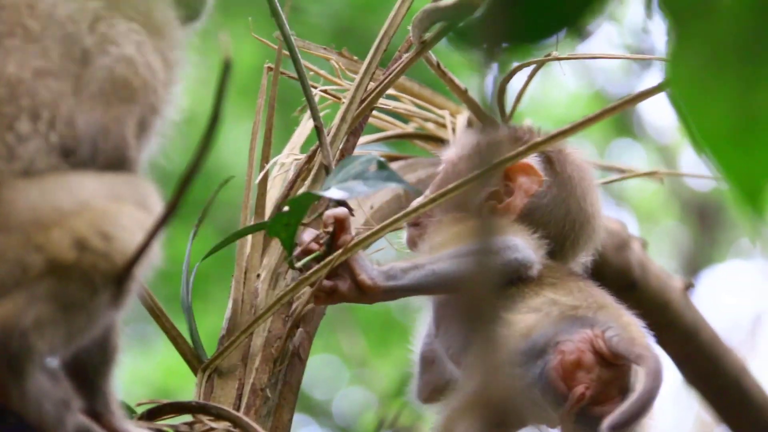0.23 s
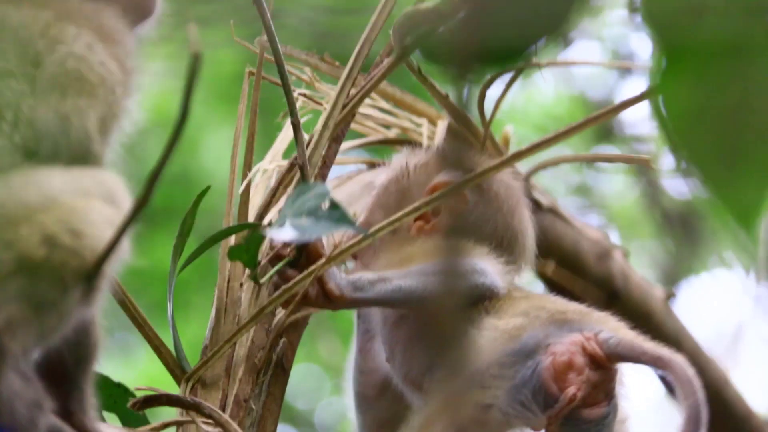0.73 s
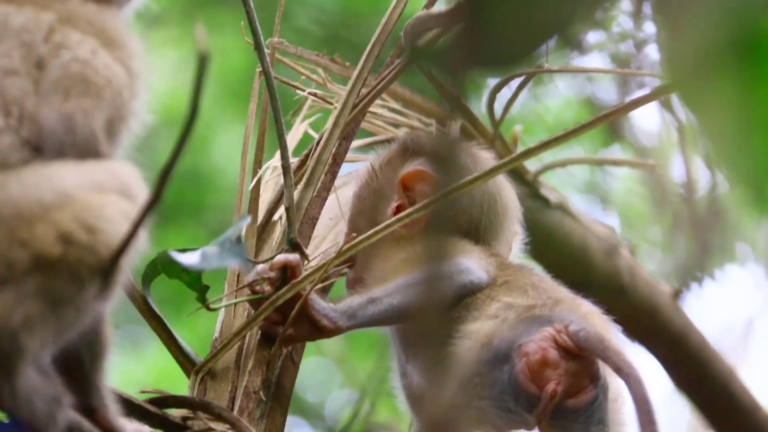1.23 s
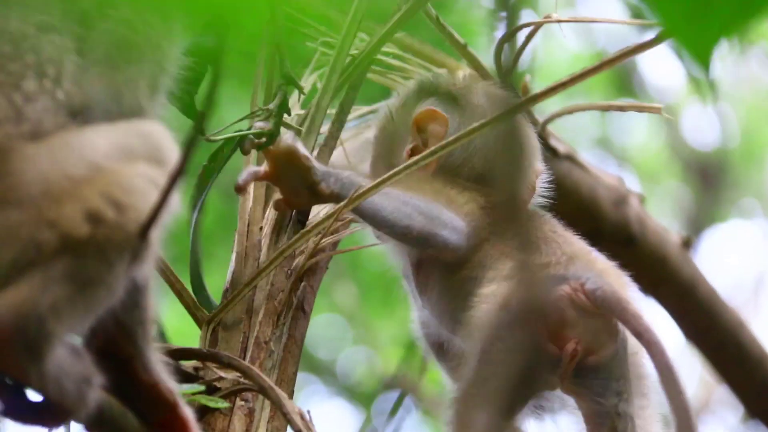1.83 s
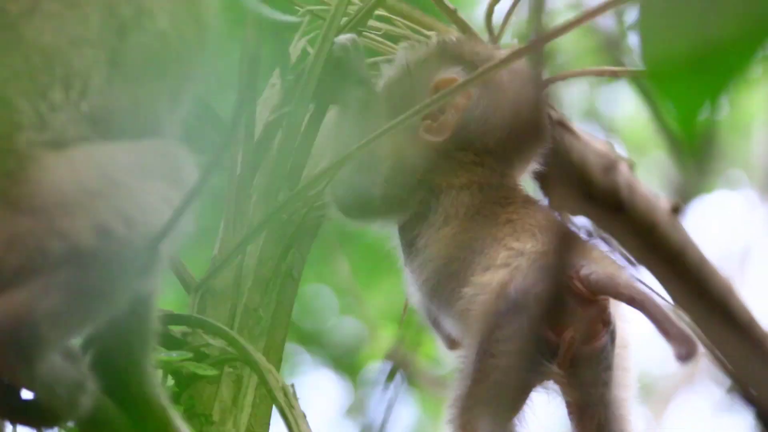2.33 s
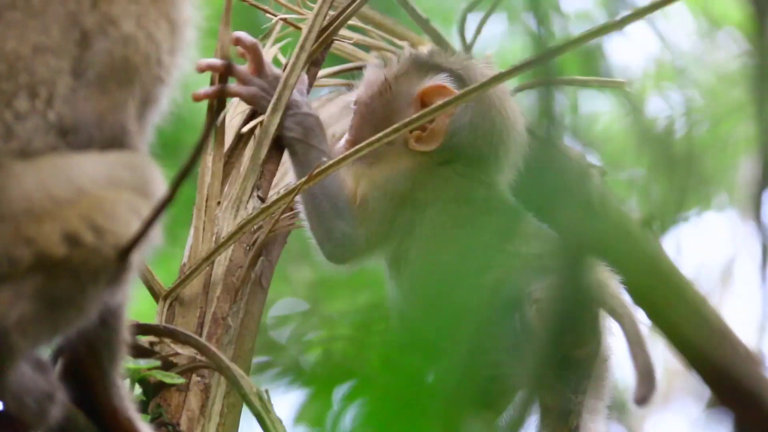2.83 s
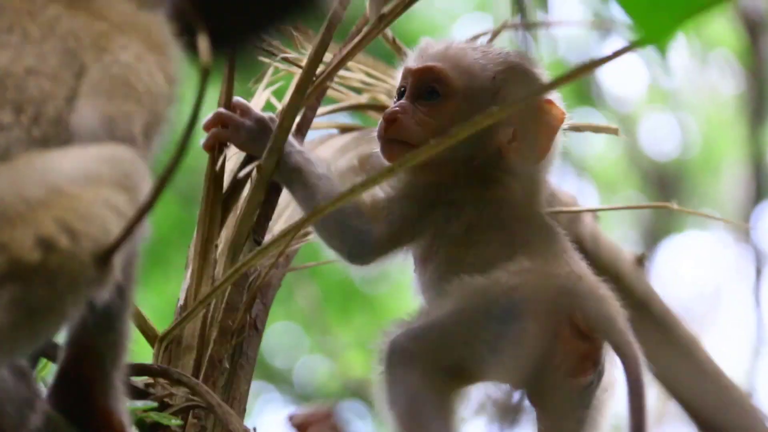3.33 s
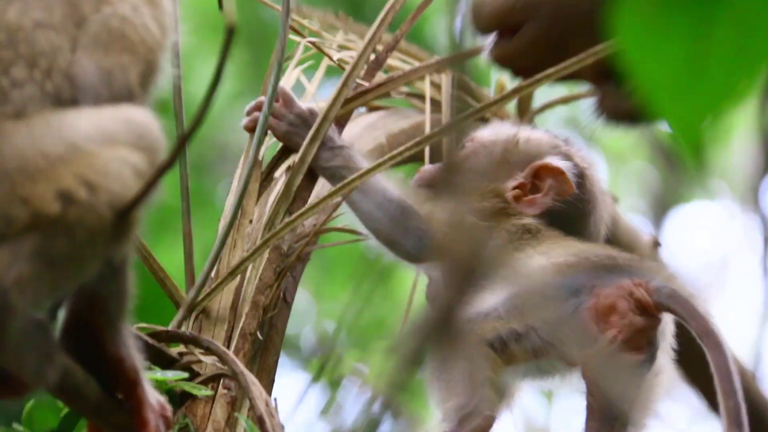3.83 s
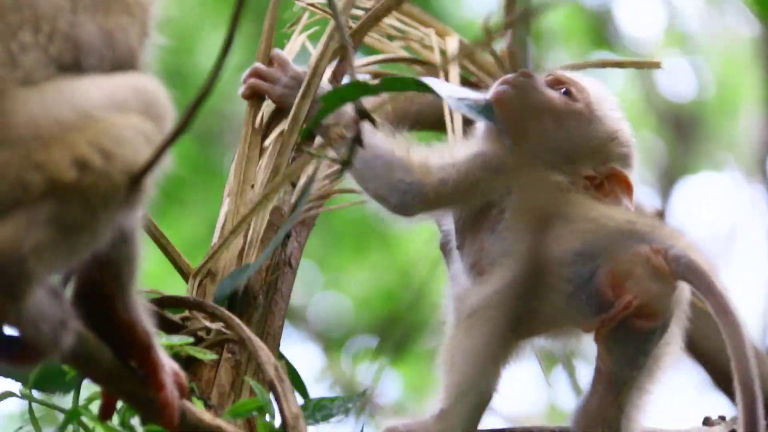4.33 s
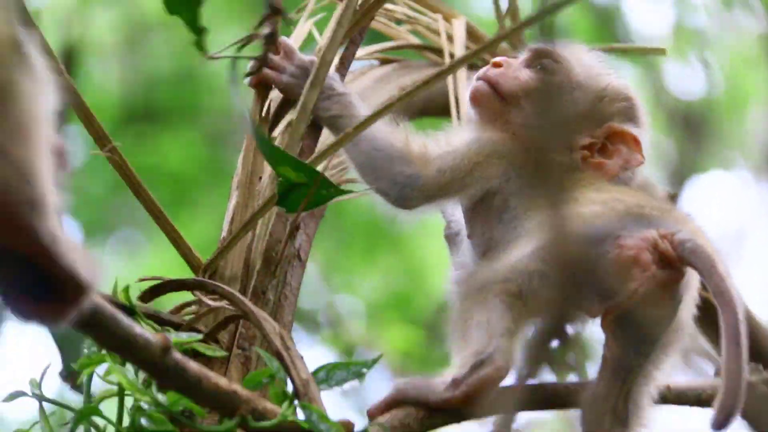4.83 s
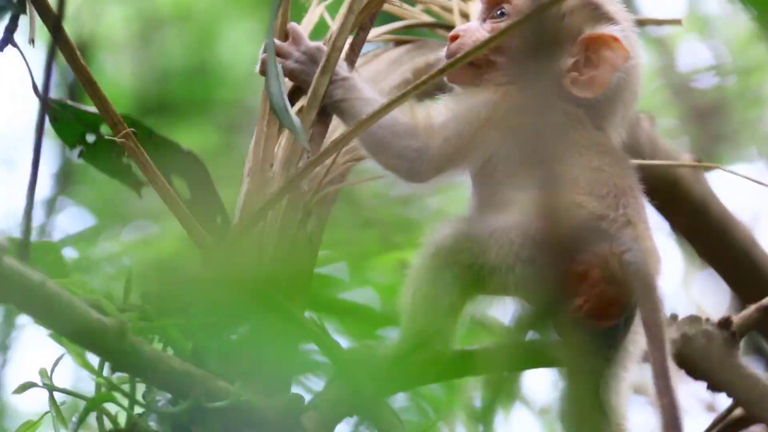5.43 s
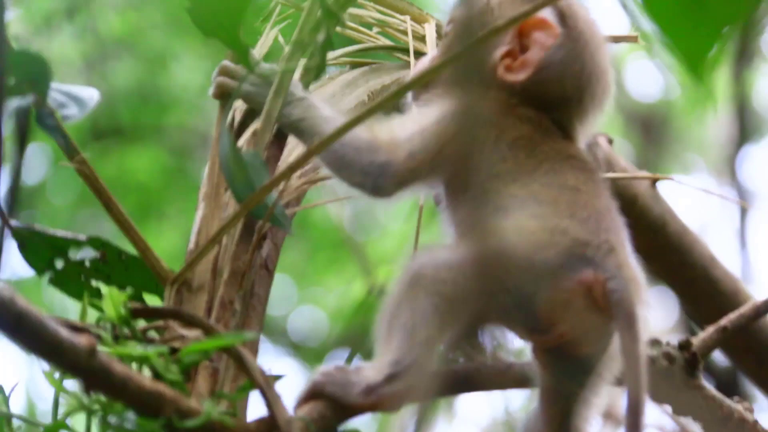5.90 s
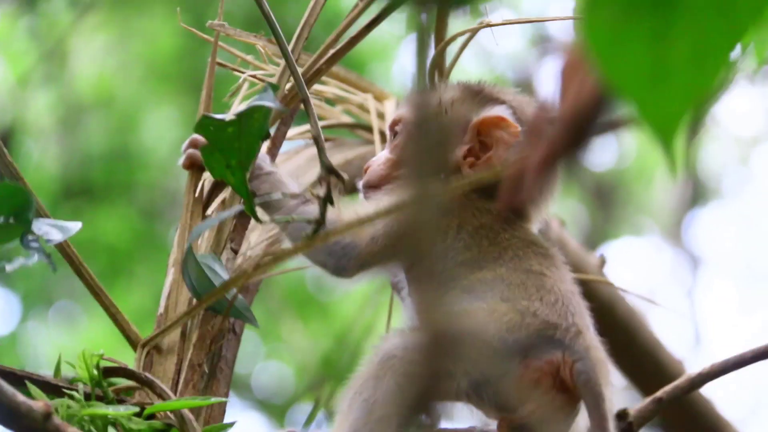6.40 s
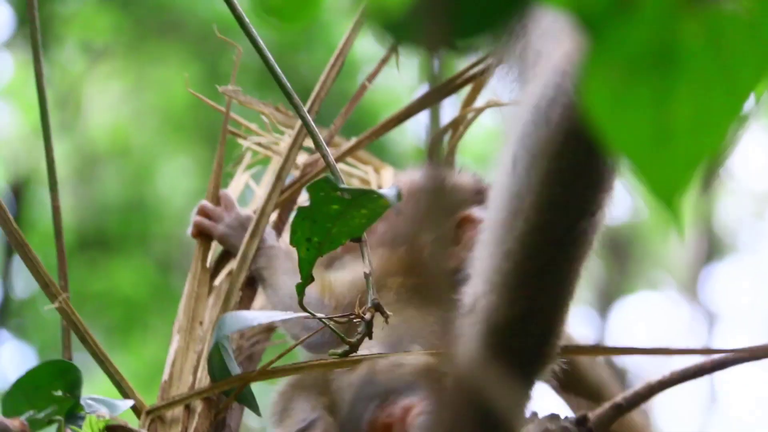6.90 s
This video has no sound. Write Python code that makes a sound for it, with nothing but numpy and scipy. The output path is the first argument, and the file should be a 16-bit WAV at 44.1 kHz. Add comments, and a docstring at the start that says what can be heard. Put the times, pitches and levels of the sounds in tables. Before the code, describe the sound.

A young monkey calls three times in quick succession, with loud falling whistles that echo through the trees, the middle one shorter, lower and wavering. Before and after, distant birds give thin chips and slurred notes, with two hoarse calls and short nasal trills early on. A soft forest hush lies underneath and rises with each coo, along with a faint insect and tiny buzzes from a focusing motor at the microphone.

```python
"""A young macaque gives three loud whistled coos that slide down and ring on among the trees.
Further off, small birds whistle, chip, rasp and trill over a faint insect and a low forest hush.
A camera's lens motor buzzes faintly. The recorder's noise suppressor opens in steps for each coo,
so the hush swells with it."""
import sys
import numpy as np
from scipy import signal
from scipy.fft import rfft, irfft, next_fast_len
from scipy.io import wavfile
from scipy.ndimage import uniform_filter1d, minimum_filter1d, map_coordinates

SR = 44100
rng = np.random.default_rng(int(sys.argv[2]) if len(sys.argv) > 2 else 0)


def output_pcm(signal):
    """Save a mono or channel-first signal as 16-bit PCM at the path in sys.argv[1].

    Samples are clipped to [-1, 1] before scaling.
    """
    pcm = np.clip(np.atleast_2d(signal).T, -1, 1) * 32767
    wavfile.write(sys.argv[1], SR, np.round(pcm).astype(np.int16))


N = 315711

# Forest hush and microphone hiss. Each row: frequency in Hz, relative density in dB.
HUSH_SPECTRUM = [(25, -22.5), (45, -6), (65, -4), (120, -2.5), (170, -7), (450, -7), (1000, -9),
                 (1600, -12.3), (3200, -17), (3900, -20), (4600, -26.5), (5100, -28.5), (7500, -31),
                 (15000, -32.5)]
# Far drone. Each row: centre in Hz, width in Hz, level in dB.
DRONE_BANDS = [(56, 7.3, -74.5), (68.7, 5.4, -72.5), (103, 8, -71)]
# Each row: time in seconds, drone gain in dB.
DRONE_GAIN = [(0, -1.5), (1.6, 2), (4, 1), (5.1, 4.5), (5.8, 1), (7.16, 0)]
# Insect bouts. Each row: middle in seconds, length in seconds.
BOUTS = [(0, 0.31), (0.908, .5), (2.55, 1.2), (6.147, 0.44), (7.15, 0.46)]
# Forest ring. Each row: frequency in Hz, T60 in seconds.
FOREST_T60 = [(500, 0.29), (1700, 1.16), (3000, 1.39), (4500, 1.3), (6500, 0.71), (12000, 0.38)]
# Thin whistles. Each row: start and length in seconds, start and end pitch in Hz, level in dB.
HIGH_WHISTLES = [(2.386, 0.38, 6740, 5640, -74), (4.045, 0.3, 7350, 5950, -75)]
# Single slurs. Each row: start and length in seconds, start and end pitch in Hz, level in dB.
SLURRED_NOTES = [(0.01, 0.061, 1900, 1534, -61.5), (0.714, 0.09, 3220, 3010, -56.5),
                 (0.866, 0.12, 2540, 2350, -60), (1.168, 0.11, 1914, 1620, -59),
                 (3.017, 0.086, 2316, 2382, -51), (6.236, 0.32, 1059, 1109, -67),
                 (6.632, 0.022, 6410, 6250, -65), (6.649, 0.029, 6400, 3050, -66),
                 (7.097, 0.034, 6860, 4700, -67)]
# Main lens moves. Each row: start in seconds, length in seconds, level in dB.
FOCUS_MOVES = [(0.19, 0.1, -62), (1.045, 0.035, -58), (1.29, 0.044, -57), (4.725, 0.066, -52),
               (5.195, 0.024, -54), (5.84, 0.14, -54.5), (6.17, 0.045, -59), (6.375, 0.051, -56.5),
               (6.6, 0.039, -57.5), (6.785, 0.048, -60.5)]
# Bird chips. Each entry: start in seconds.
CHIP_STARTS_S = [0.372, 0.657, 0.985, 1.238, 1.755, 2.045, 2.928, 3.208, 4.31, 4.567, 4.957, 5.243, 5.553,
                 6.168, 6.465]
# Burry calls. Each row: start in seconds, first note's delay in seconds, pitch in Hz, level in dB.
BURRS = [(1.356, 0.061, 2323, -51), (2.138, .024, 2270, -50.5)]
# Flick opening a burry call. Each row: multiple of the pitch, gain in dB.
FLICK_TIMBRE = [(1, 0.5), (1.4, -11)]
# Trills. Each row: start in seconds, note count, first pitch in Hz, first level in dB.
TRILL_RUNS = [(1.752, 4, 912, -58), (2.595, 6, 906, -58.5)]
# Nasal trill note. Each row: harmonic number, gain in dB.
TRILL_TIMBRE = [(2, -1.5), (3, -9.5), (4, 1.5), (5, -13)]
# Mouth response to a coo's octave. Each row: frequency in Hz, gain in dB.
MOUTH_RESPONSE = [(3300, -4), (3850, 7), (4200, -13.5), (5500, -19), (6100, -11.5), (6600, -5),
                  (6850, -13.5)]
# High coos. Each row: start in seconds, length in seconds, held level in dB.
HIGH_COO_CALLS = [(2.833, 0.497, -44), (4.479, 0.5, -41.5)]
# Their slide: drop, plateau, second fall. Each row: fraction of the call, pitch in Hz.
HIGH_COO_PITCH = [(0, 4610), (.075, 3624), (.12, 3453), (.25, 3235), (.56, 2960), (.77, 2510), (.89, 2214),
                  (1, 2078)]
# Wavering effort of the low coo. Each row: time in seconds, level in dB.
LOW_COO_EFFORT = [(3.612, -53.5), (3.65, -42.5), (3.69, -49.5), (3.704, -32), (3.77, -49.5), (3.783, -36),
                  (3.911, -45.5), (3.944, -42.5), (4.0, -58)]
# Suppressor's detector weighting. Each row: frequency in Hz, gain in dB.
DETECTOR_WEIGHT = [(1700, -0.5), (2800, 0.5)]
# Suppressor steps. Each row: threshold in dB, added gain in dB.
SUPPRESSOR_STEPS = [(-48.5, 3.5), (-44, 5.5), (-39.5, 5.5)]


def amp(db):
    """Decibels to gain."""
    return 10 ** (np.asarray(db) / 20)


def unit_rms(x):
    """Scale to rms 1."""
    return x / np.sqrt(np.mean(x ** 2) + 1e-20)


def along(points, hz):
    """Interpolate (Hz, value) points on a log axis."""
    knots_hz, values = np.transpose(points)
    return np.interp(np.log(hz + 1), np.log(knots_hz + 1), values)


def wobble(rate_hz):
    """Smooth random curve through rate_hz knots a second."""
    knots = rng.standard_normal(int(N * rate_hz / SR) + 4)
    return map_coordinates(knots, [np.arange(N) * rate_hz / SR])


def filtered(x, response):
    """Apply a gain given as a function of Hz."""
    size = next_fast_len(N + SR // 2)
    return irfft(rfft(x, size) * response(np.fft.rfftfreq(size, 1 / SR)), size)[:N]


def add(track, start_s, sound):
    """Mix a sound into the track."""
    part = track[max(round(start_s * SR), 0):][:len(sound)]
    part += sound[:len(part)]


def glide(length_s, start_hz, end_hz, rough=0, partials=((1, 0),)):
    """Soft-edged sliding note; rough is its fractional pitch flutter."""
    n = max(int(length_s * SR), 16)
    flutter = map_coordinates(rng.standard_normal(256), [np.arange(n) * 450 / SR], mode="wrap")
    pitch_hz = np.geomspace(start_hz, end_hz, n) * (1 + rough * flutter)
    phase = 2 * np.pi * np.cumsum(pitch_hz) / SR
    return signal.windows.tukey(n, .5) * sum(amp(db) * np.sin(k * phase) for k, db in partials)


def among_trees(x, near_db, far_db, near_t60_s):
    """Direct sound, quick scatter off close trunks and leaves, and the forest's long ring."""
    hz, frame_s, spectra = signal.stft(rng.standard_normal(3 * SR // 2), SR, nperseg=256)
    decay = amp(-60 * frame_s / along(FOREST_T60, hz)[:, None])
    far = signal.istft(spectra * decay, SR, nperseg=256)[1]
    t = np.arange(len(far)) / SR
    far *= 1 - np.exp(-t / .038)
    trunks = rng.standard_normal(len(t)) ** 3  # cubed: single echoes stand out
    near = trunks * amp(-60 * t / near_t60_s) * (1 - np.exp(-t / .0028))
    echoes = amp(near_db) * near / np.linalg.norm(near) + amp(far_db) * far / np.linalg.norm(far)
    return x + signal.fftconvolve(x, echoes)[:N]


def hush(air_db=-58.5):
    """Near-steady air and hiss over a wavering far drone."""
    air = unit_rms(filtered(rng.standard_normal(N), lambda hz: amp(along(HUSH_SPECTRUM, hz))))
    drone = np.zeros(N)
    for centre_hz, width_hz, db in DRONE_BANDS:
        band = filtered(rng.standard_normal(N), lambda hz: 1 / (1 + (2 * (hz - centre_hz) / width_hz) ** 2))
        drone += amp(db) * unit_rms(band)
    drone_gain_db = np.interp(np.arange(N) / SR, *np.transpose(DRONE_GAIN))
    return air * amp(air_db + .2 * wobble(2.5)) + drone * amp(drone_gain_db)


def insect(centre_hz=4460, width_hz=110, level_db=-78):
    """Narrow buzz, throbbing unevenly; each bout swells and fades."""
    t = np.arange(N) / SR
    buzz = filtered(rng.standard_normal(N), lambda hz: np.exp(-((hz - centre_hz) / width_hz) ** 2))
    bouts = sum(np.exp(-(2 * (t - middle_s) / length_s) ** 2) for middle_s, length_s in BOUTS)
    return unit_rms(buzz) * bouts * amp(level_db + 2.5 * wobble(32))


def whistling_birds(rise_start_s=.23, rise_period_s=.066, rise_db=-59.5):
    """Canopy whistles: three rising notes, thin sinking tones and single slurs."""
    song = np.zeros(N)
    for k in range(3):
        rise = glide(.054, start_hz=2330, end_hz=2750, rough=.034)
        add(song, rise_start_s + k * rise_period_s, amp(rise_db) * rise)
    for notes, rough in (HIGH_WHISTLES, .003), (SLURRED_NOTES, .022):
        for start_s, length_s, start_hz, end_hz, db in notes:
            add(song, start_s, amp(db) * glide(length_s, start_hz, end_hz, rough))
    return among_trees(song, near_db=-7, far_db=-6, near_t60_s=.3)


def lens_motor(slot_s=.53, nudge_s=.05, nudge_db=-65):
    """Short low focusing buzzes, plus one faint nudge at a random moment in each slot."""
    buzz = np.zeros(N)
    nudges = [(start_s, nudge_s, nudge_db) for start_s in slot_s * (np.arange(12) + rng.random(12))]
    for start_s, length_s, db in list(FOCUS_MOVES) + nudges:
        move = glide(length_s, start_hz=218.8, end_hz=213.6, partials=((1, 0), (2, -9)))
        add(buzz, start_s, amp(db) * move)
    return buzz


def chipping_bird(level_db=-69):
    """Very fast sweeps that swell as they fall, blurred by leaves."""
    song = np.zeros(N)
    for start_s in CHIP_STARTS_S:
        sweep = glide(.02, start_hz=7800, end_hz=3800, rough=.035)
        add(song, start_s, amp(level_db + np.linspace(-4, 2, len(sweep))) * sweep)
    return among_trees(song, near_db=3, far_db=-2, near_t60_s=.09)


def burry_bird(flick_gain_db=-4.5, period_s=.05, loss_db=2):
    """Rough upward flick, then three hoarse notes, each weaker than the last."""
    song = np.zeros(N)
    for start_s, delay_s, hz, db in BURRS:
        flick = glide(.036, start_hz=2400, end_hz=3473, rough=.07, partials=FLICK_TIMBRE)
        add(song, start_s, amp(db + flick_gain_db) * flick)
        for k in range(3):
            note = glide(.035, hz, hz, rough=.042)
            add(song, start_s + delay_s + k * period_s, amp(db - k * loss_db) * note)
    return among_trees(song, near_db=-1, far_db=-6, near_t60_s=.47)


def trilling_bird(period_s=.0736, sag_hz=5, swell_db=.33):
    """Even runs of falling nasal notes, each lower and louder than the last."""
    song = np.zeros(N)
    for start_s, count, first_hz, db in TRILL_RUNS:
        for k in range(count):
            hz = first_hz - k * sag_hz
            note = glide(.034, hz * 1.03, hz * .97, rough=.022, partials=TRILL_TIMBRE)
            add(song, start_s + k * period_s, amp(db + k * swell_db) * note)
    return among_trees(song, near_db=-2, far_db=-5.5, near_t60_s=.32)


def coo(pitch_hz, level_db, octave_db, jitter, fade_s=.006):
    """Unsteady, nearly pure throat whistle; mouth resonances lift its weak octave."""
    n = len(pitch_hz)
    pitch_hz = pitch_hz * (1 + jitter * wobble(70.1) + .0024 * wobble(500))[:n]
    phase = 2 * np.pi * np.cumsum(pitch_hz) / SR
    fades = signal.windows.tukey(n, 2 * fade_s * SR / n)
    effort = fades * amp(level_db + 1.8 * wobble(80)[:n])
    octave_gain = amp(octave_db + along(MOUTH_RESPONSE, 2 * pitch_hz))
    return np.sqrt(2) * effort * (np.sin(phase) + octave_gain * np.sin(2 * phase))


def high_coo(length_s, held_db, onset_s=.02, swell_s=.092, release_s=.14):
    """Long slide that starts softly and rings out as it passes a throat resonance."""
    throat_hz, throat_width_hz = 3244, 49
    t = np.arange(int(length_s * SR)) / SR
    pitch_hz = np.interp(t / length_s, *np.transpose(HIGH_COO_PITCH))
    attack_db = 14 * np.maximum(1 - t / onset_s, 0) + 3.5 * np.maximum(1 - t / swell_s, 0)
    release_db = 14.5 * np.maximum(1 - (length_s - t) / release_s, 0)
    throat_db = 6.5 / (1 + ((pitch_hz - throat_hz) / throat_width_hz) ** 2)
    return coo(pitch_hz, held_db - attack_db - release_db + throat_db, octave_db=-32, jitter=.0025)


def low_coo(start_hz=2683, bottom_hz=1678, fall_s=.268, lift_hz_per_s=392):
    """Shorter call: the fall slows to a stop, then turns gently upward."""
    times_s, effort_db = np.transpose(LOW_COO_EFFORT)
    t = np.arange(int((times_s[-1] - times_s[0]) * SR)) / SR
    fall_hz = (start_hz - bottom_hz) * np.maximum(1 - t / fall_s, 0) ** 2
    lift_hz = lift_hz_per_s * np.maximum(t - fall_s, 0)
    level_db = np.interp(times_s[0] + t, times_s, effort_db)
    return coo(bottom_hz + fall_hz + lift_hz, level_db, octave_db=-29.5, jitter=.003)


def macaque():
    """Two high coos with a lower, drier one between them."""
    high, low = np.zeros(N), np.zeros(N)
    for start_s, length_s, db in HIGH_COO_CALLS:
        add(high, start_s, high_coo(length_s, db))
    add(low, LOW_COO_EFFORT[0][0], low_coo())
    drier = among_trees(low, near_db=-9.5, far_db=-9.3, near_t60_s=.42)
    return among_trees(high, near_db=-2, far_db=-4, near_t60_s=.31) + drier


def scene():
    """All sources at the microphone, mono."""
    birds = chipping_bird() + whistling_birds() + burry_bird() + trilling_bird()
    return (macaque() + birds + insect() + lens_motor() + hush())[None]


def record(dry):
    """Noise suppressor: gain steps up with level and holds briefly. The recorder then cuts the top."""
    window_s, hold_s, smooth_s, top_hz = .05, .085, .02, 15550
    sensed = filtered(dry[0], lambda hz: amp(along(DETECTOR_WEIGHT, hz)))
    power = np.abs(uniform_filter1d(sensed ** 2, int(window_s * SR)))
    level_db = 10 * np.log10(power + 1e-12)
    hold = int(hold_s * SR)
    held_db = -minimum_filter1d(-level_db, hold, origin=(hold - 1) // 2)  # trailing maximum
    gain_db = sum(step_db * np.clip(held_db - open_db + .5, 0, 1) for open_db, step_db in SUPPRESSOR_STEPS)
    gain_db = uniform_filter1d(gain_db, int(smooth_s * SR))
    return filtered(dry[0] * amp(gain_db), lambda hz: hz < top_hz)[None]


dry = scene()
out = record(dry)
output_pcm(out)
```